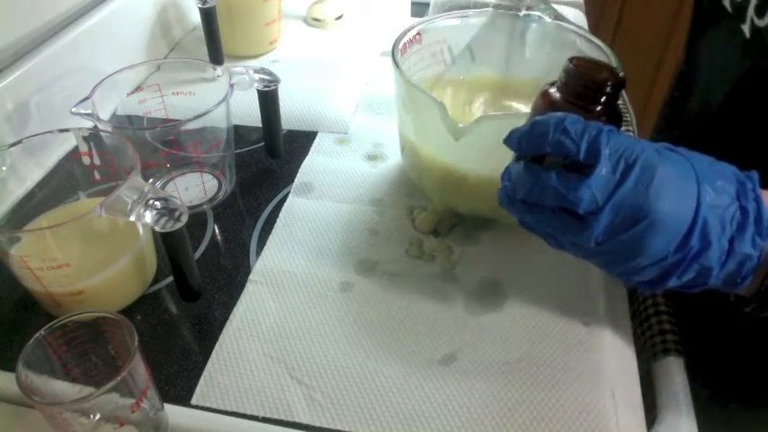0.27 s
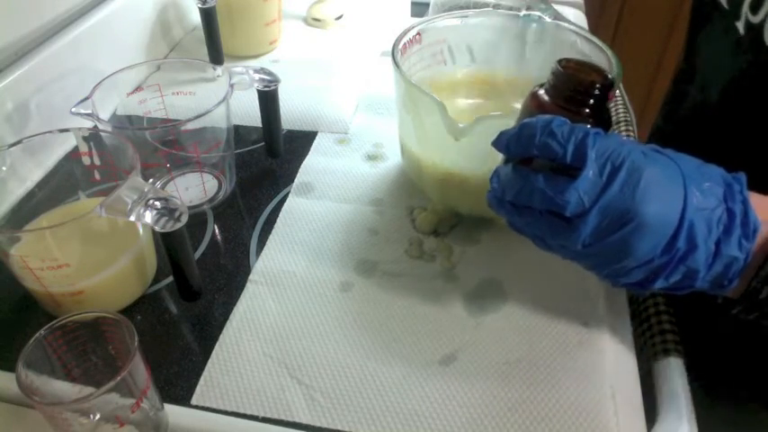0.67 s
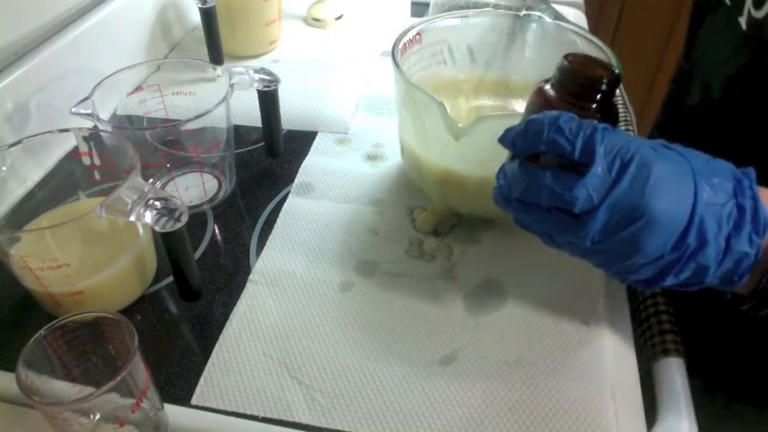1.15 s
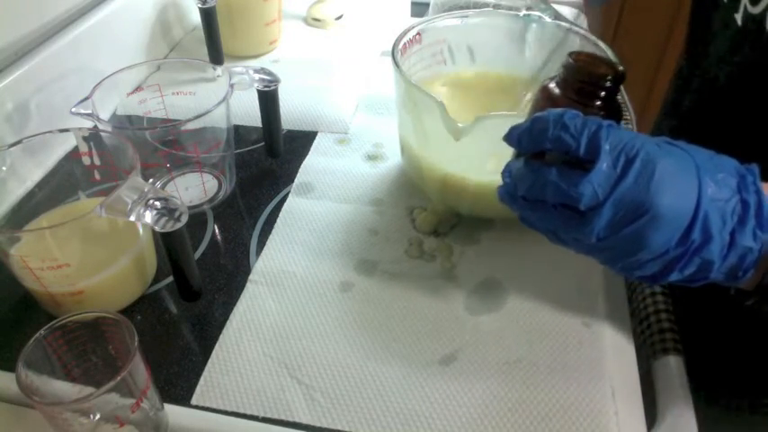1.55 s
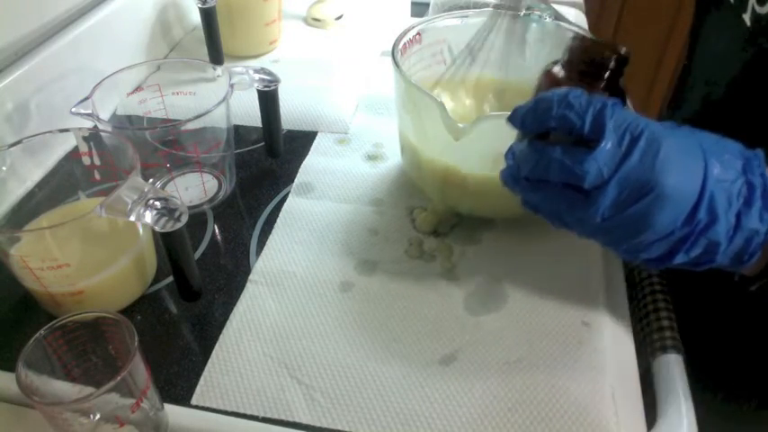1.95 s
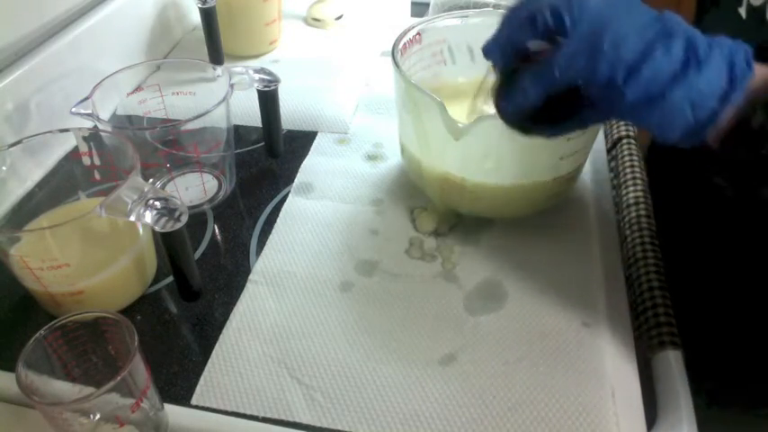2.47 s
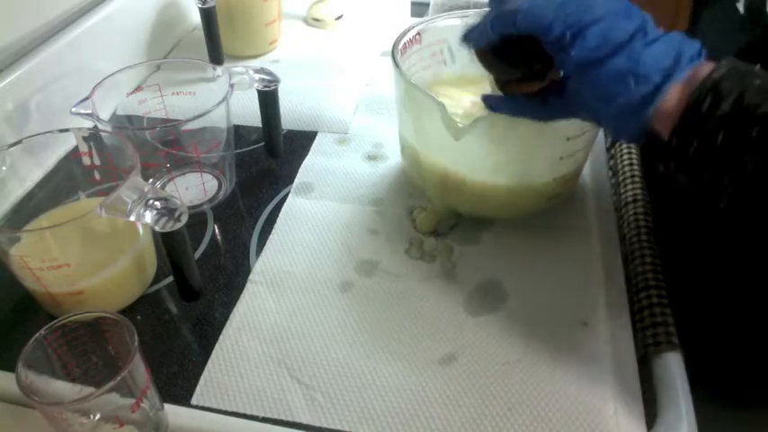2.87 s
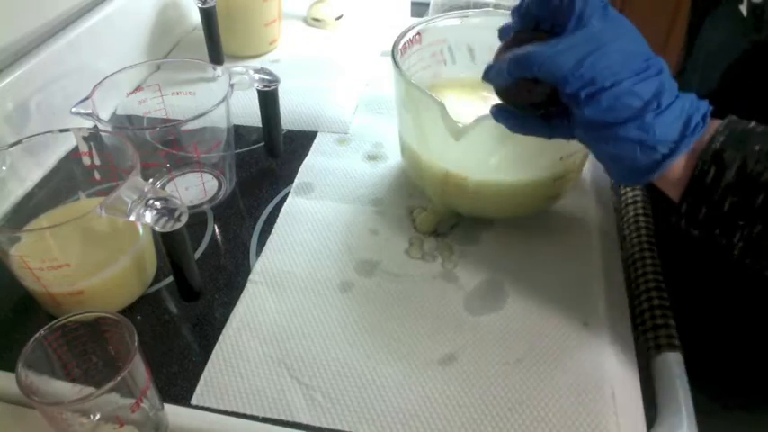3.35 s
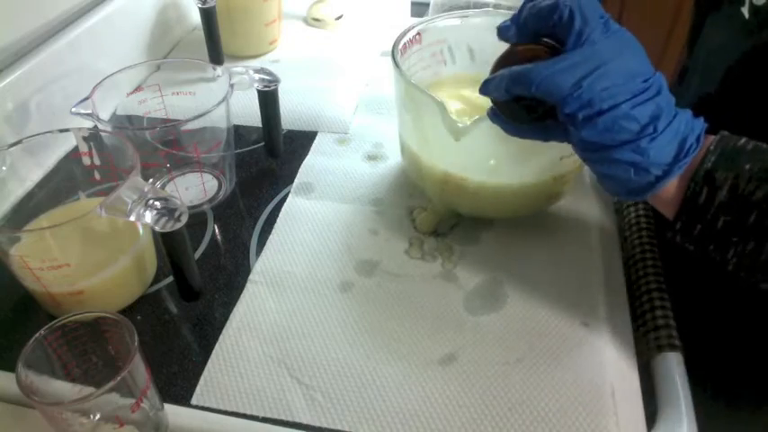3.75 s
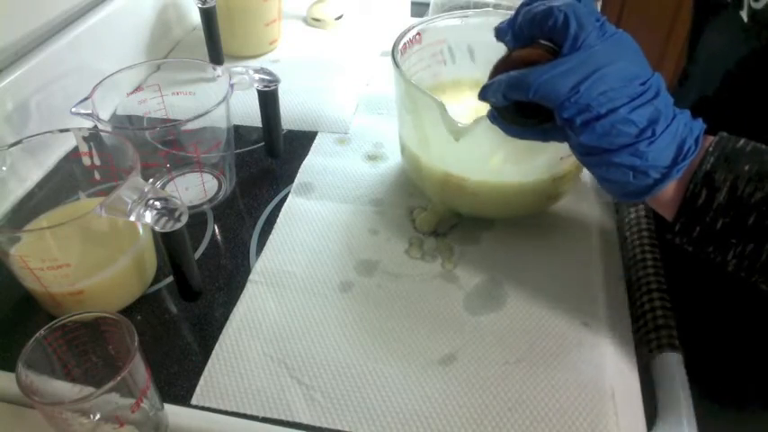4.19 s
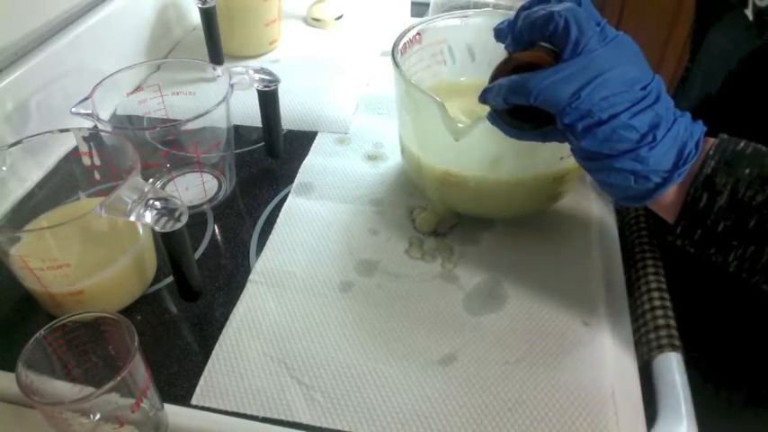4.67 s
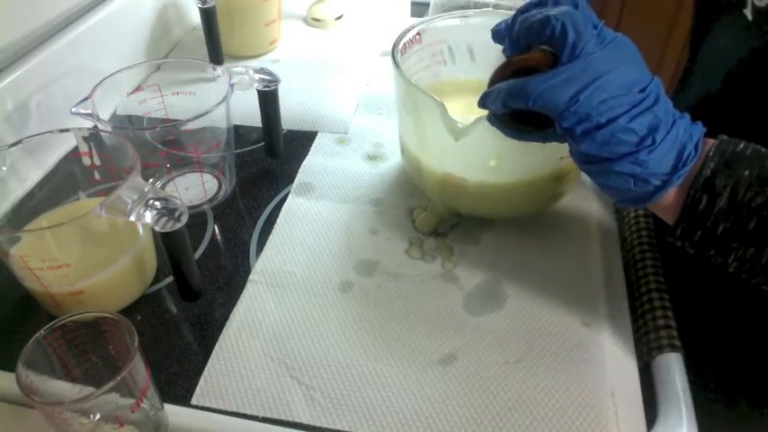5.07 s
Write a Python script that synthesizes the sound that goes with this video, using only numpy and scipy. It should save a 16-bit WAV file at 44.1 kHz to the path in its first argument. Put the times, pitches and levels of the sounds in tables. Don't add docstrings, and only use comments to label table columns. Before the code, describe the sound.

Close at a counter, whisk wires clatter in tight bursts against batter-damped glass, with wet scraping and low jug notes. Midway the beating stops; a loud blunt bottle knock bounces once, dull bumps follow, then beating returns denser and harder to the end. Quiet appliance hum and brief hard-walled reflections.

```python
import sys
import numpy as np
from scipy import signal
from scipy.io import wavfile
from scipy.ndimage import uniform_filter1d

SR = 44100
rng = np.random.default_rng(int(sys.argv[2]) if len(sys.argv) > 2 else 0)


def volts(x):
    e = np.asarray(x, float) / 20
    return 10 ** e


def to_wav(s):
    ch = np.atleast_2d(s).T
    pcm = np.round(np.clip(ch, -1, 1) * 32767)
    wavfile.write(sys.argv[1], SR, pcm.astype(np.int16))


N = 234645


def evened(x):
    return x / np.sqrt(np.mean(x ** 2) + 1e-20)


def unit_energy(x):
    return x / np.linalg.norm(x)


def read(points, hz):
    f, value = np.transpose(points)
    return np.interp(np.log(hz + 1), np.log(f + 1), value)


def colour(x, points):
    gain_db = np.maximum(read(points, abs(np.fft.fftfreq(4096, 1 / SR))), -100)
    log_gain = np.log(volts(gain_db))
    taps = np.fft.ifft(np.exp(np.conj(signal.hilbert(log_gain)))).real[:2048]
    return signal.oaconvolve(x, unit_energy(taps))[:len(x)]


def butter(x, order, hz, kind):
    return signal.sosfilt(signal.butter(order, hz, kind, fs=SR, output="sos"), x)


def ring(x, hz, width):
    r = np.exp(-np.pi * width / SR)
    turn = 2 * np.pi * hz / SR
    start = np.sqrt(2 * (1 - r * r)) * np.sin(turn)
    return signal.lfilter([0, start], [1, -2 * r * np.cos(turn), r * r], x)


def clink(x, hz, width):
    contact_widths = 5.0
    b, a = signal.iirpeak(hz, hz / (contact_widths * width), SR)
    return signal.lfilter(b, a, ring(x, hz, width))


def train(s, size):
    at = np.clip(np.round(s * SR).astype(int), 0, N - 1)
    return np.bincount(at.ravel(), size.ravel(), N)


# frequency in Hz, level in dB per Hz.
AIR = [(34, -56.5), (50, -10.5), (100, -11.5), (160, -7.5), (260, 0), (420, -10), (600, -10), (940, -8),
       (1300, -18), (3000, -30.5), (6000, -57), (16000, -55.5)]
# frequency in Hz, level in dB.
HUM = [(119.5, -67.5), (145, -62), (239, -70.5), (399, -70.5), (554, -70)]


def background():
    t = np.arange(N) / SR
    out = volts(-57.68) * evened(colour(rng.standard_normal(N), AIR))
    for hz, db in HUM:
        waver = evened(uniform_filter1d(rng.standard_normal(N), size=4000))
        phase = 2 * np.pi * hz * t + 0.7 * waver[::-1]
        out += volts(db + 3 + 1.5 * waver) * np.sin(phase)
    return out


# frequency in Hz, width in Hz, level in dB.
GLASS_MODES = [(1485, 60, -15.5), (1786, 240, -10), (2160, 84, -8), (2470, 116, -2.5), (2757, 57, -5.5),
               (3113, 190, -7), (3540, 450, -4.5), (3680, 160, -6), (3960, 62, -6.5), (4330, 190, -1.5),
               (4194, 140, -4.5), (4660, 410, -2), (4980, 44, -5.5), (5293, 120, -10.5), (5730, 320, -5),
               (6170, 150, -5), (6574, 90, -6), (7050, 330, -1), (7460, 200, -6.5), (8800, 150, -12.5),
               (9500, 260, -14), (11400, 850, -16.5), (8210, 160, -14), (10080, 110, -19.5),
               (12500, 480, -18), (14400, 300, -17.5)]
# frequency in Hz, level in dB per Hz.
WIRE_TICK = [(120, -50.5), (200, 8), (442, -42), (532, 0), (1090, -16.5), (1390, -9.5), (1940, -6),
             (2510, -1), (2960, -2), (4210, -5), (14000, -35), (15600, -32.5), (16500, -39.5)]
# time in seconds, level in dB.
RUB = [(0.0, -43), (.55, -75), (.75, -44), (1.85, -53), (2.1, -59), (2.45, -44.5), (2.831, -65),
       (3.02, -40), (3.2, -74), (3.6, -40.5), (4.4, -39), (4.62, -46), (5.05, -59), (5.32, -53)]


def rub():
    s, db = np.transpose(RUB)
    hits = rng.random(N) < 3000 / SR
    grains = rng.standard_normal(N) * volts(2.5 * rng.exponential(1, N)) * hits
    rung = np.zeros(N)
    for hz, width, mode_db in GLASS_MODES:
        rung += volts(mode_db) * ring(grains * rng.standard_normal(N), hz, width)
    both = 0.92 * evened(rung) + 0.46 * evened(colour(grains, WIRE_TICK))
    return volts(np.interp(np.arange(N) / SR, s, db) - 13.5) * evened(both)


# start in seconds, blow in dB, loudest mode in Hz,
# time the wires take to land in seconds.
BEATS = [(0.0833, -24, 3980, .028), (0.295, -25.5, 4340, 0.025), (0.5164, -29.5, 4130, 0.025),
         (0.748, -22.5, 4250, 0.025), (0.9755, -29, 4240, 0.029), (1.214, -24.5, 6950, 0.027),
         (1.451, -21, 4140, 0.021), (1.668, -32.5, 4390, 0.013), (1.9118, -21.5, 4180, .013),
         (2.18, -27, 1700, .026), (2.4066, -27.5, 2550, 0.026), (3.2795, -34.5, 2570, 0.0066),
         (3.5338, -32.5, 2700, 0.014), (3.58, -34, 2340, 0.015), (3.763, -20, 5120, .013),
         (3.9722, -21.5, 6170, 0.013), (4.189, -21.5, 2210, 0.015), (4.301, -27, 4380, .01),
         (4.401, -19, 2470, .013), (4.6042, -22, 2470, .017), (4.7228, -25.5, 3880, 0.014),
         (4.8196, -19, 4140, 0.018), (4.9257, -20.5, 3650, 0.013), (5.0286, -19, 2600, 0.014),
         (5.125, -30.5, 5800, .02), (5.229, -19, 2530, 0.02)]
# start in seconds, blow in dB, loudest mode in Hz,
# landing time in seconds.
SWEEPS = [(0.0, -42, 5000, 0.035), (.218, -36.5, 4150, 0.02), (0.654, -39, 2260, 0.021),
          (1.125, -42, 6660, 0.012), (1.1708, -51, 7200, 0.05), (1.3494, -47, 4650, 0.042),
          (1.4087, -52, 4330, 0.024), (1.5897, -48.5, 3300, 0.023), (1.6366, -38, 4300, .015),
          (1.686, -32, 4370, .015), (1.946, -37, 4020, .029), (2.061, -42.5, 2470, 0.036),
          (2.102, -39.5, 2300, 0.024), (2.1582, -35, 6640, 0.027), (2.285, -44.5, 3210, 0.048),
          (3.0, -43, 5570, .022), (3.1892, -45.5, 4570, .028), (3.307, -43.5, 5670, 0.035),
          (3.434, -40, 1800, 0.015), (3.6429, -40.5, 3500, 0.026), (3.7251, -30, 2650, 0.021),
          (3.836, -39, 2570, 0.03), (3.865, -44, 4260, .024), (3.93, -36, 2790, 0.023),
          (4.048, -38.5, 3450, 0.027), (4.142, -41, 2650, 0.029), (4.268, -31.5, 4230, .03),
          (4.486, -33.5, 3740, 0.011), (4.695, -41, 2350, .023)]
# start in seconds, blow in dB,
# loudest mode in Hz, landing time in seconds.
STRAYS = [(0.025, -44, 2070, .017), (0.2049, -39.5, 6900, 0.013), (0.4187, -44, 6850, 0.011),
          (0.4316, -35, 2230, 0.01), (0.4685, -45, 4400, 0.012), (0.6403, -39, 5640, 0.011),
          (0.726, -46.5, 7100, .008), (0.8686, -43.5, 6900, 0.026), (.892, -35.5, 4730, .012),
          (1.108, -41.5, 6970, .018), (1.318, -55.5, 2710, .01), (1.4418, -27, 2720, 0.0032),
          (1.8298, -44.5, 7200, 0.0074), (1.84, -41.5, 2130, 0.01), (1.894, -49, 4560, 0.036),
          (2.379, -53, 2180, 0.05), (2.544, -51, 7270, .009), (3.418, -65, 4300, .01),
          (3.521, -43, 5900, 0.011), (3.667, -36, 5730, 0.018), (4.3626, -38, 2680, 0.018),
          (4.5745, -34, 2644, 0.017), (4.7808, -37, 2700, 0.027), (5.178, -53, 7600, .008)]
# start in seconds, blow in dB, loudest mode in Hz,
MUFFLED = [(0.2838, -30.5, 2035, 0.0061), (1.739, -45, 2400, 0.0048), (1.867, -43, 4200, .004),
           (2.922, -47, 4800, 0.0081), (2.9513, -36.5, 2630, .013), (2.9868, -32, 3750, 0.018),
           (3.044, -60, 4030, 0.014), (3.105, -57, 2630, 0.034), (3.1458, -41.5, 3140, 0.0057),
           (3.1702, -46.5, 5260, 0.018), (3.2376, -32, 4550, 0.0073), (3.345, -47.5, 4600, 0.021),
           (3.3736, -18.5, 1706, 0.0094), (3.375, -24.5, 2850, .012), (3.381, -30, 4130, 0.0069),
           (3.2378, -28, 3150, 0.007), (3.454, -44, 1250, 0.035), (4.1, -43, 4660, 0.012),
           (4.9054, -33, 2860, 0.02), (4.99, -37, 2720, 0.014)]
# treble in dB, share of the loudest mode in dB.
TOUCH_COLOUR = [
    (-11.5, -5.5),
    (-14.5, -6),
    (-8, -1),
    (-29, -2.5),
]


def touches():
    out = []
    for rows, (treble_db, share_db) in zip((BEATS, SWEEPS, STRAYS, MUFFLED), TOUCH_COLOUR):
        out += [(s, db, treble_db, hz, share_db, landing) for s, db, hz, landing in rows]
    return out


def whisk(count=10, size=6):
    s, blow_db, treble_db, best_hz, best_db, landing = (c[:, None] for c in np.transpose(touches()))
    strokes, hits, modes = len(s), count * size, len(GLASS_MODES)
    wire = np.arange(hits) // size

    def per_wire(*more):
        return np.repeat(rng.random((strokes, count, *more)), size, axis=1)

    late = (wire + per_wire() * (wire > 0)) / count
    bounces = np.arange(hits) % size > 0
    chatter = -0.006 * np.log(1 - rng.random((strokes, hits))) * bounces
    at = s + late * landing + chatter

    light = np.clip((-25.5 - blow_db) / 14, 0, 1)
    force = np.minimum(0.61 + late * landing / 0.003, 1) * volts(-5.0 * late - 630 * chatter)
    luck = np.where(wire > 0, 2 * per_wire() - 1, 0.6)
    force = force * volts((3.5 + 9.3 * light) * luck)
    force = force / np.linalg.norm(force, axis=1, keepdims=True)
    force = force * volts(blow_db) * np.sqrt(landing * SR)
    share = np.clip(volts(best_db), 0, 0.97)
    rest = force * np.sqrt(1 - share ** 2)
    sign = rng.choice([-1.0, 1.0], (strokes, hits))

    stroke_db = (3.37 + 8.5 * light[..., None]) * (2 * rng.random((strokes, 1, modes)) - 1)
    wire_db = 5.34 * (2 * per_wire(modes) - 1)
    weight = (2 * rng.random((strokes, hits, modes)) - 1) * volts(stroke_db + wire_db)
    out = np.zeros(N)
    for k, (hz, width, db) in enumerate(GLASS_MODES):
        above = max(np.log2(hz / 3500), 0)
        tilt_db = (treble_db + 14.5) * above / 1.71 - 7.7 * (late - 0.4) * np.log2(hz / 4100)
        out += clink(train(at, rest * weight[..., k] * volts(db + tilt_db - 4.5)), hz, width)

    for times, blows, hz in zip(at, force * share * sign, best_hz[:, 0]):
        part = out[round(times[0] * SR):][:SR // 6]
        clicks = train(times - times[0], blows)[:len(part)]
        part += volts(-1.0) * clink(clicks, hz, 95 + 0.012 * hz)

    ticks = sign * rest * volts(-19.0 * light)
    dull = butter(train(at, ticks), 2, 4800, "low")
    sharp = butter(train(at, ticks * volts(treble_db + 19.0)), 2, 4900, "high")
    t = np.arange(SR // 50) / SR
    slap = rng.standard_normal(len(t)) * volts(-4000 * t)
    scrape = signal.oaconvolve(dull + sharp, unit_energy(slap))[:N]
    out = out + volts(-3.0) * colour(scrape, WIRE_TICK)
    return butter(out, 3, 520, "high")


# frequency in Hz, width in Hz, level in dB.
BODY_MODES = [(140.8, 7.1, -11), (253, 7.2, -11.5), (522, 8.6, -5), (565, 15, -0.5), (630, 18, -6.5),
              (696, 15.4, -0.5), (791, 13, -2), (800, 16, -25), (960, 11, -32), (513, 23, -40.5),
              (1430, 63, -14)]
# start in seconds, peak in dB, low note in Hz.
ROCKS = [(0.103, -28, 532.5), (0.298, -35, 930), (0.649, -33, 716), (0.772, -27.5, 522),
         (0.877, -41.5, 760), (0.975, -41.5, 523), (1.221, -31, 907), (1.451, -27, 768),
         (1.678, -42.5, 763), (1.915, -33.5, 510), (2.111, -40, 630), (2.16, -39.5, 713), (2.409, -39, 890),
         (3.004, -39, 590), (3.463, -38.5, 601), (3.667, -29.5, 567), (3.773, -33.5, 530),
         (3.978, -37.5, 710), (4.194, -34, 565), (4.281, -39.5, 672), (4.307, -42, 669), (4.403, -35, 790),
         (4.612, -38, 556), (4.731, -53, 750), (4.824, -59, 544), (4.927, -25.5, 750), (5.041, -37, 575),
         (5.129, -30, 717), (5.238, -39, 545)]


def rocks():
    out, t = np.zeros(N), np.arange(SR // 3) / SR
    for s, db, hz in ROCKS:
        push = rng.standard_normal(len(t)) * np.minimum(t / 0.0067, 1) * volts(-1500 * t)
        push = unit_energy(push)
        body = sum(volts(d - 30.0) * evened(ring(push, f, width + 3.3)) for f, width, d in BODY_MODES)
        note = clink(push, hz, 13 + 0.059 * max(hz - 500, 0))
        part = out[round((s - 0.004) * SR):][:len(t)]
        part += volts(db) * (body + volts(20.0) * unit_energy(note))[:len(part)]
    return out


# frequency in Hz, width in Hz, level in dB.
BOTTLE_MODES = [(1420, 37, -24), (2230, 80, -12.5), (2700, 40, -27.5), (4330, 60, -14), (5800, 24, -8),
                (5900, 16, -12.5), (7950, 84, -13), (10100, 60, -30), (13000, 64, -28)]
# frequency in Hz, level in dB per Hz.
RIM_THUD = [(60, -28), (130, -15), (400, -27), (620, 5.5), (1090, -7), (1500, -9.5), (2650, -8),
            (3600, -41), (5500, -21.5), (8000, -34), (9000, -72.5), (16000, -94)]
# start in seconds, blow in dB, low note in Hz, dull rattle in dB,
# rattle tilt in dB per octave.
BOTTLE_KNOCKS = [
    (2.779, -6, 630, 0.5, 3.2),
    (2.789, -12, 620, 3, 1),
]
# start in seconds, blow in dB, low note in Hz, dull rattle in dB, #
# rattle tilt in dB per octave.
HANDLE_KNOCKS = [
    (3.283, -17, 518, -22, 4.9),
    (3.374, -19.5, 565, 10.5, 9.7),
]


def knocks():
    out, t = np.zeros(N), np.arange(SR // 3) / SR
    free_db, held_db = -35, -64
    rows = [(free_db, *k) for k in BOTTLE_KNOCKS] + [(held_db, *k) for k in HANDLE_KNOCKS]
    for bottle_db, s, blow_db, best_hz, rattle_db, tilt_db in rows:
        noise = rng.standard_normal(len(t))
        blow = unit_energy(noise * volts(-2300 * t) * (rng.random(len(t)) < 0.15))
        both = np.zeros(len(t))
        for hz, width, db in BODY_MODES:
            near_db = 7.3 * np.exp(-(np.log(hz / best_hz) / 0.13) ** 2)
            both += volts(db - 35 + near_db) * evened(ring(blow, hz, width))
        for hz, width, db in BOTTLE_MODES:
            both += volts(db + bottle_db) * evened(ring(blow, hz, width))
        tilted = [(hz, db + tilt_db * np.log2(min(hz, 1800) / 1000)) for hz, db in RIM_THUD]
        rattle = volts(rattle_db) * colour(volts(11) * blow + volts(-15 - 730 * t) * noise, tilted)
        part = out[round((s - 0.0012) * SR):][:len(t)]
        part += volts(blow_db) * (both + rattle)
    return out


# frequency in Hz, time to fall 60 dB in seconds.
ROOM_DECAY = [(150, 0.19), (600, 0.49), (2500, 0.26), (6000, 0.23), (12000, 0.17)]


def room(x, count=3, size=22):
    out = np.zeros(N)
    turn = np.pi * np.arange(N) / SR / 0.37
    for k in range(count):
        taps = np.zeros(SR // 2)
        at = np.arange(8 * size, len(taps) - size, size)
        taps[at + rng.integers(0, size, len(at))] = rng.choice([-1., 1.], len(at))
        hz, t, z = signal.stft(taps, SR, nperseg=256)
        decay = volts(-60 * t / read(ROOM_DECAY, hz)[:, None])
        tail = signal.istft(z * decay, SR, nperseg=256)[1]
        share = np.sqrt(2 / count) * np.cos(turn + k * np.pi / count)
        out += signal.oaconvolve(x * share, unit_energy(tail))[:N]
    return out


def scene():
    jug = rub() + whisk() + rocks() + knocks()
    jug = butter(jug, 4, 112, "high")
    mix = jug + volts(-11.5) * room(jug) + background()
    return mix[None]


def roll_off(x):
    return signal.sosfilt(signal.butter(12, 16990, fs=SR, output="sos"), x)


def record(dry):
    mix = signal.oaconvolve(dry, signal.firwin(255, 15800, fs=SR)[None], "same")
    return roll_off(mix)


dry = scene()
out = record(dry)
to_wav(out)
```